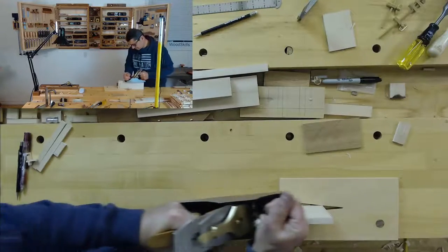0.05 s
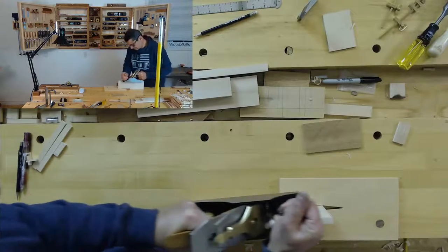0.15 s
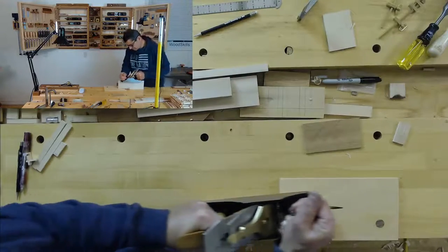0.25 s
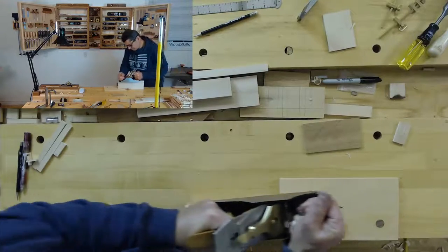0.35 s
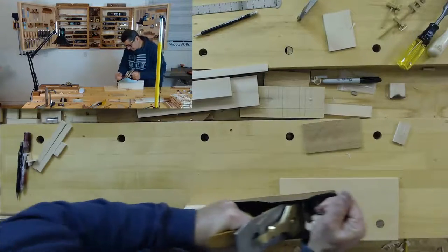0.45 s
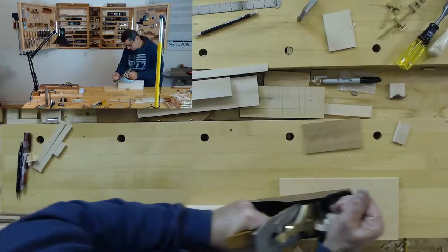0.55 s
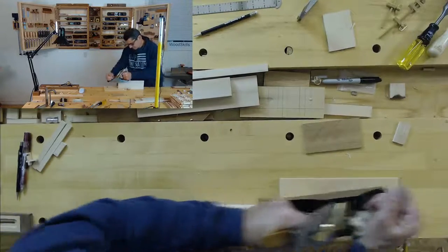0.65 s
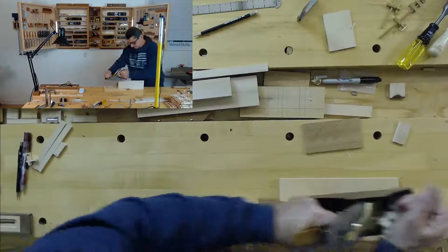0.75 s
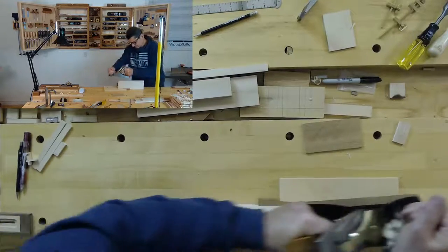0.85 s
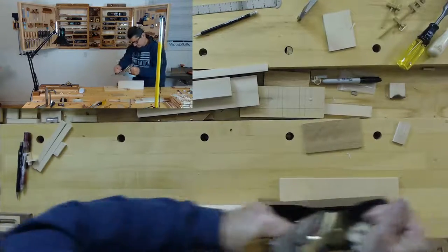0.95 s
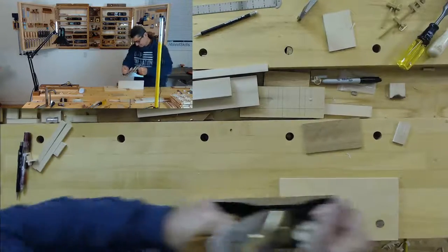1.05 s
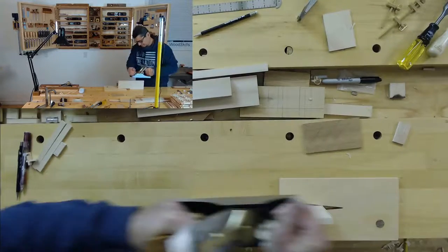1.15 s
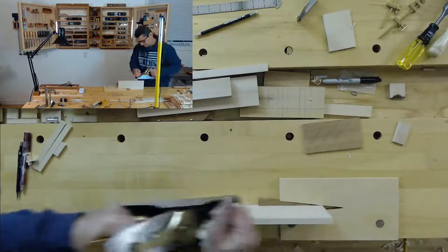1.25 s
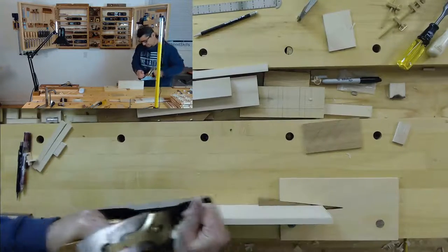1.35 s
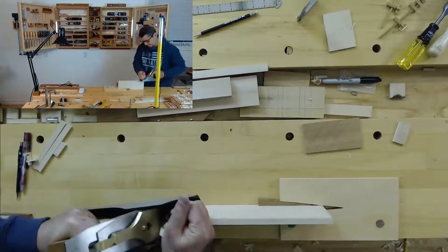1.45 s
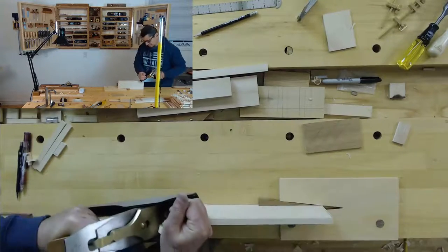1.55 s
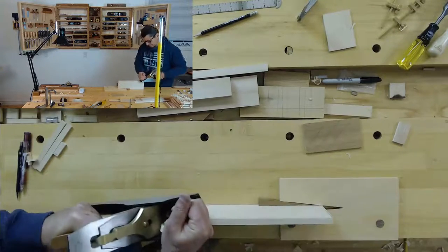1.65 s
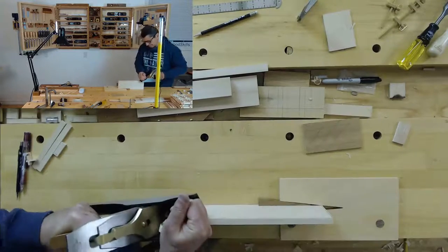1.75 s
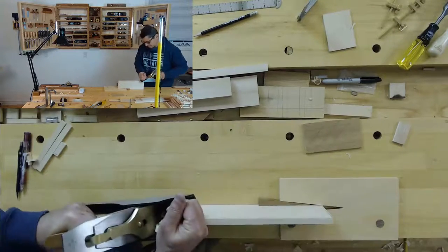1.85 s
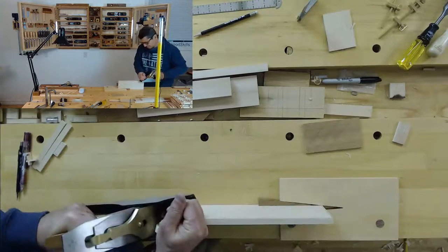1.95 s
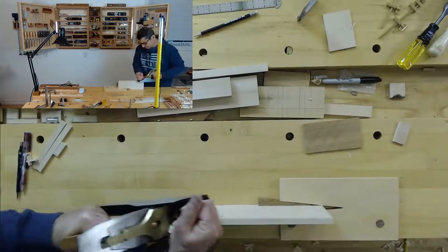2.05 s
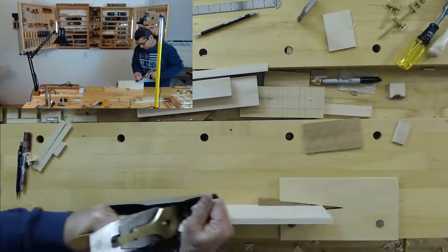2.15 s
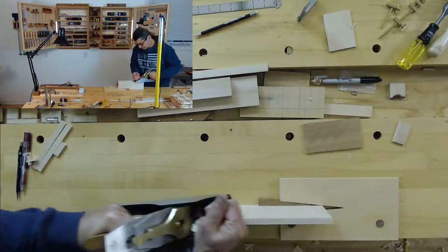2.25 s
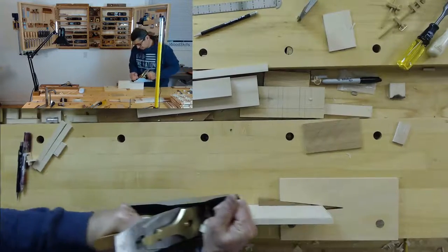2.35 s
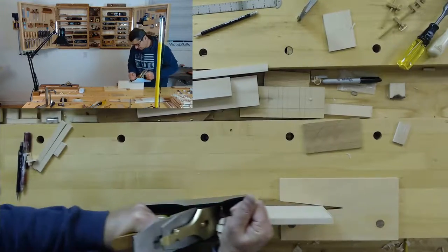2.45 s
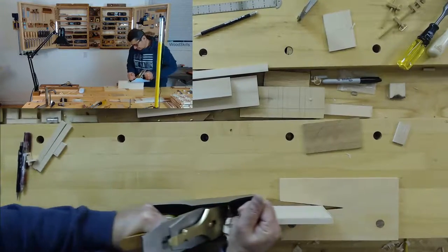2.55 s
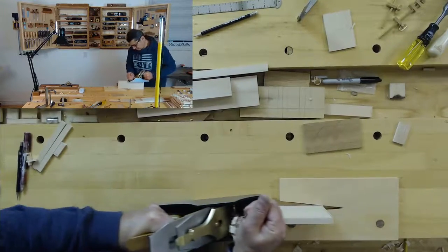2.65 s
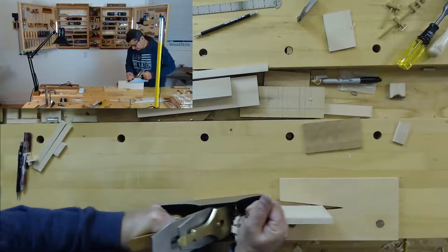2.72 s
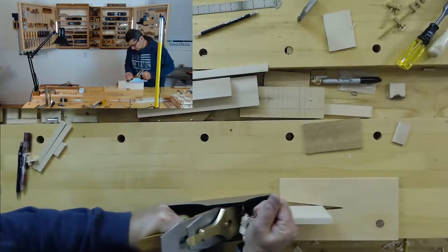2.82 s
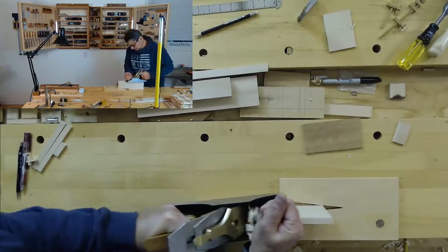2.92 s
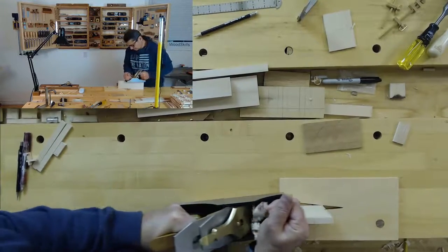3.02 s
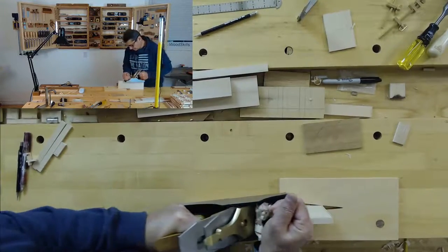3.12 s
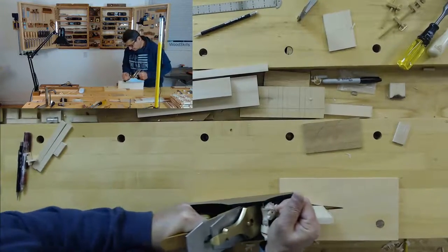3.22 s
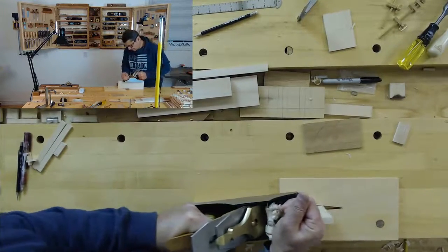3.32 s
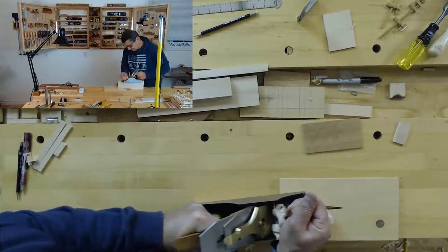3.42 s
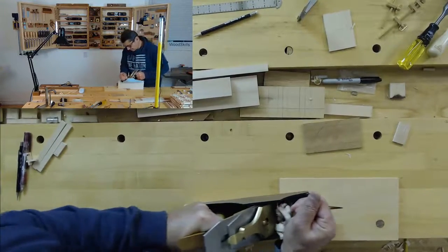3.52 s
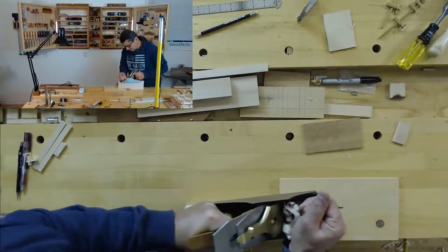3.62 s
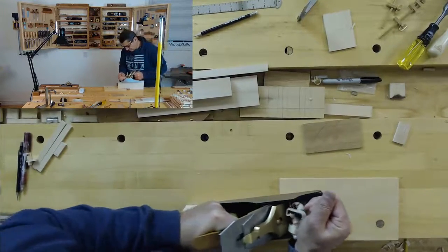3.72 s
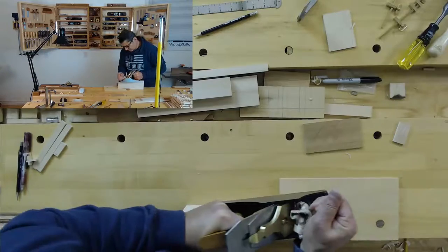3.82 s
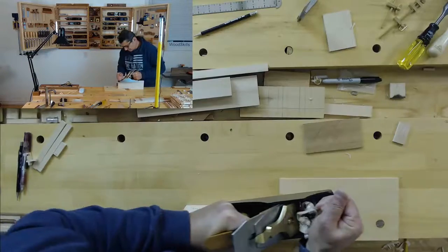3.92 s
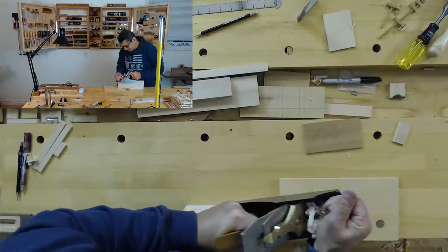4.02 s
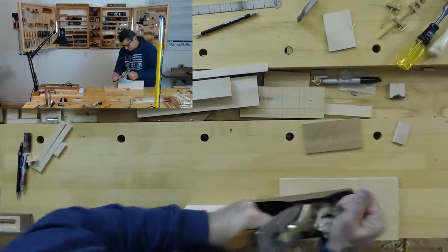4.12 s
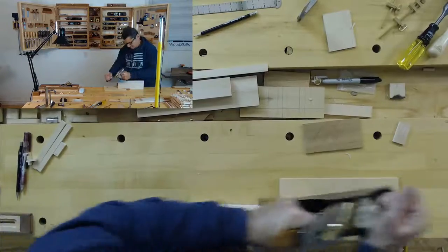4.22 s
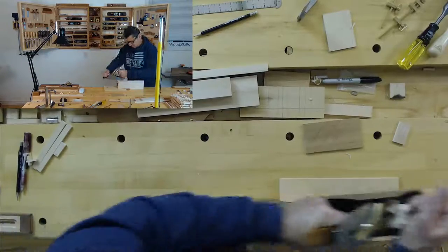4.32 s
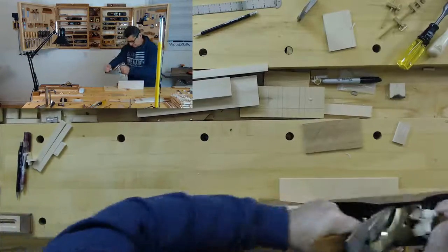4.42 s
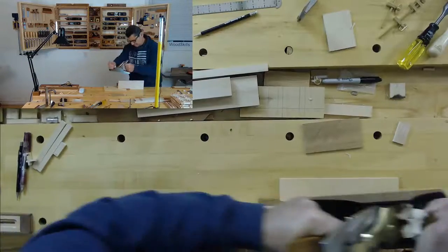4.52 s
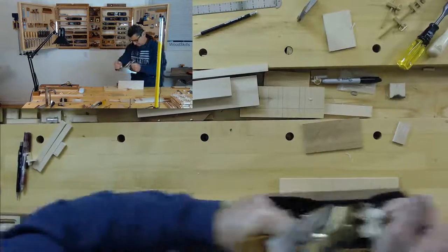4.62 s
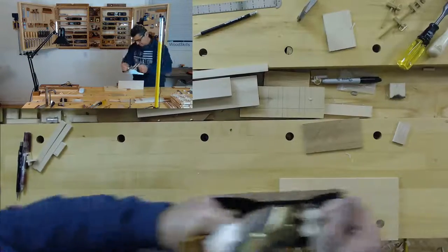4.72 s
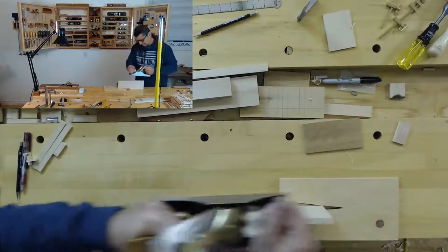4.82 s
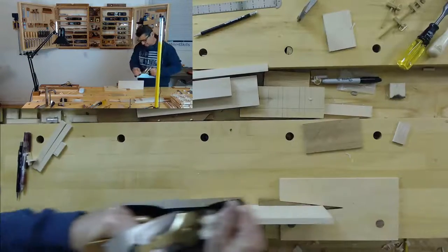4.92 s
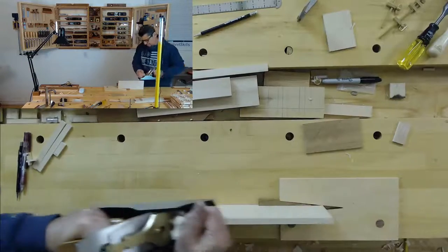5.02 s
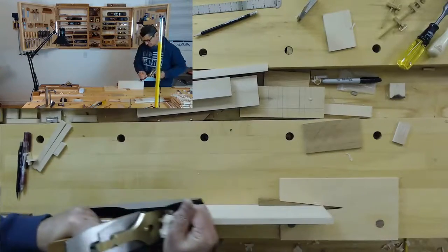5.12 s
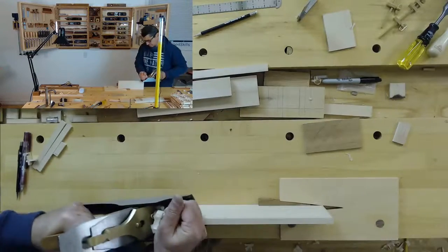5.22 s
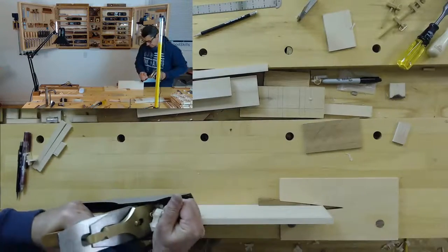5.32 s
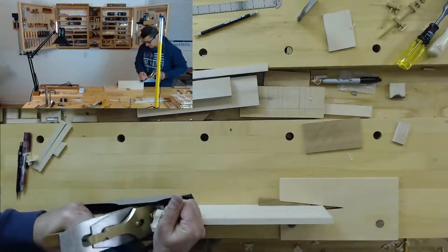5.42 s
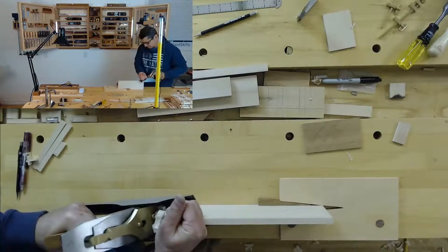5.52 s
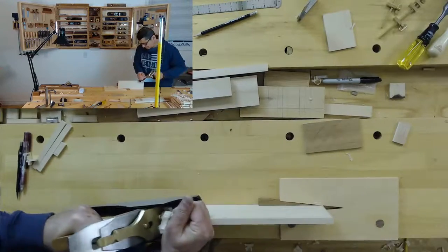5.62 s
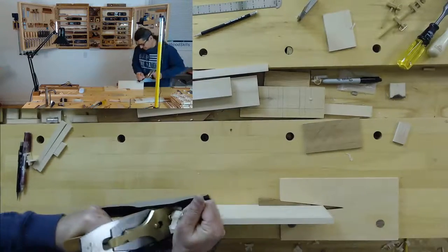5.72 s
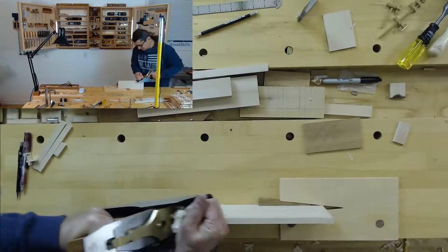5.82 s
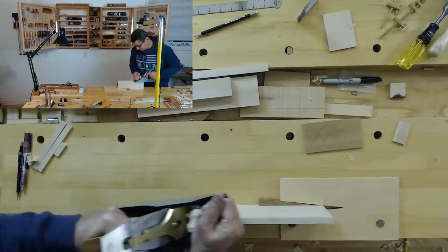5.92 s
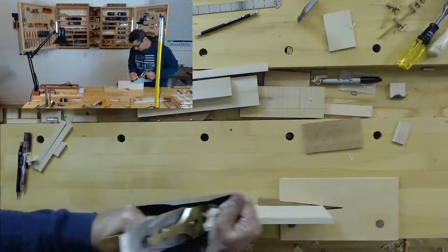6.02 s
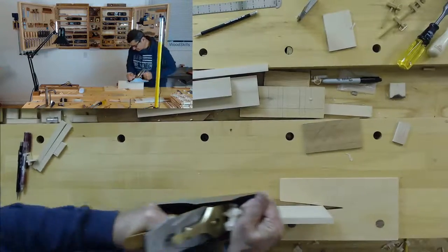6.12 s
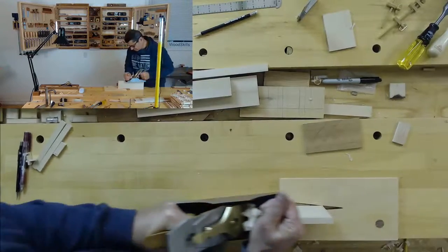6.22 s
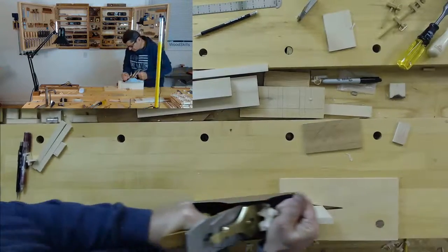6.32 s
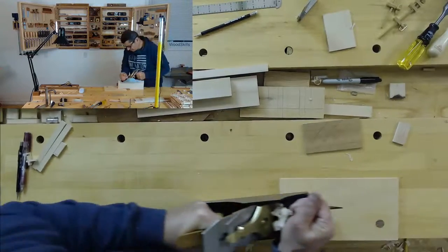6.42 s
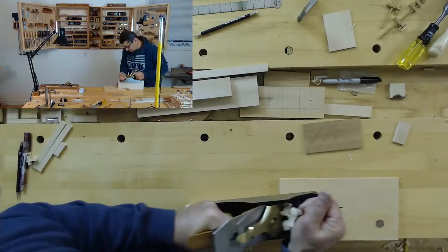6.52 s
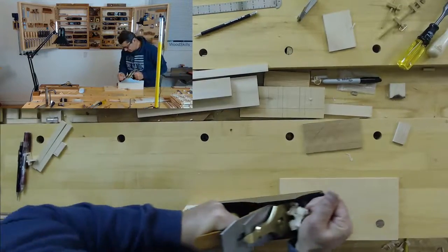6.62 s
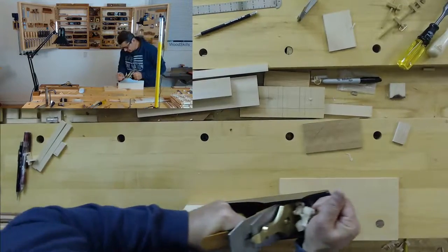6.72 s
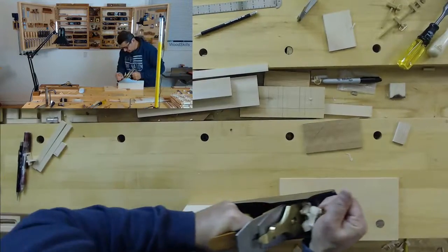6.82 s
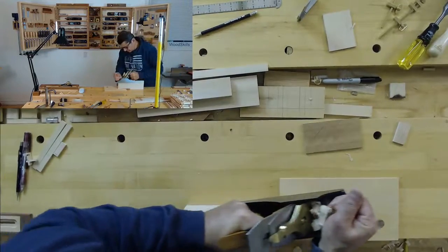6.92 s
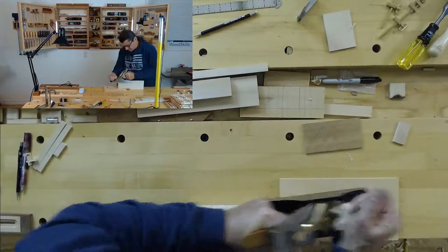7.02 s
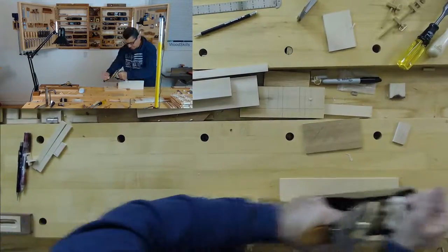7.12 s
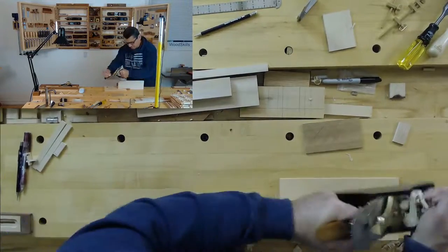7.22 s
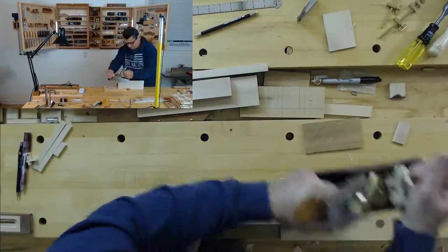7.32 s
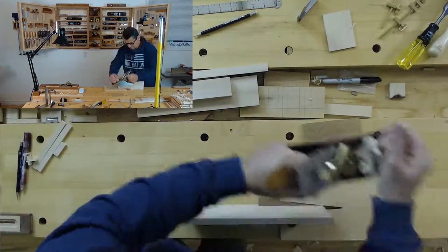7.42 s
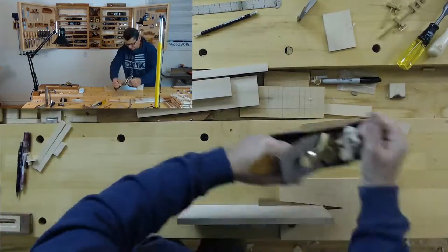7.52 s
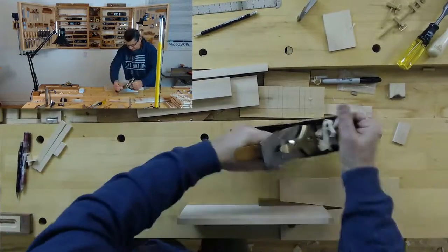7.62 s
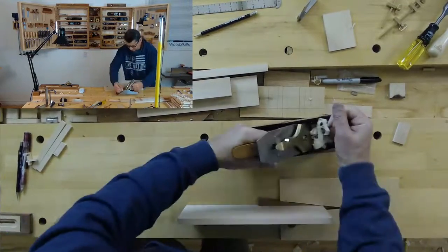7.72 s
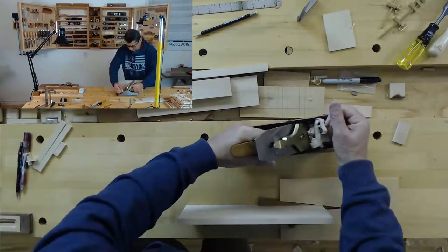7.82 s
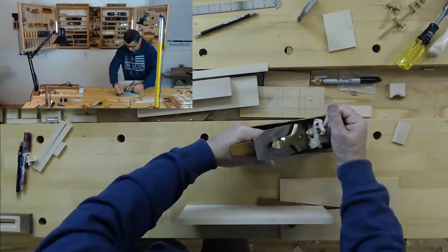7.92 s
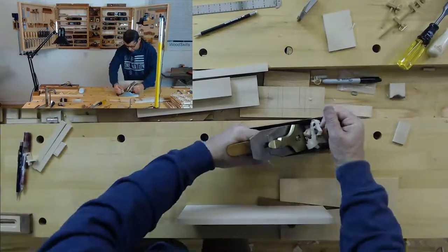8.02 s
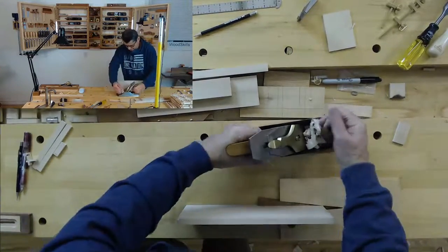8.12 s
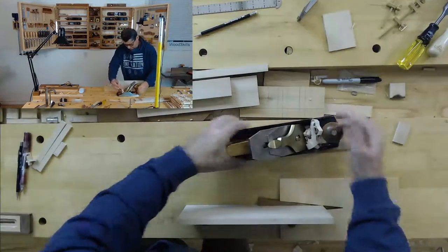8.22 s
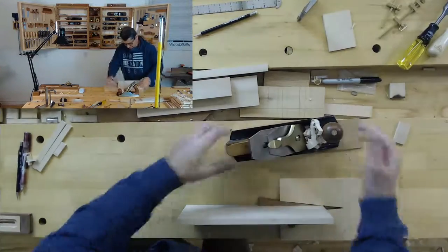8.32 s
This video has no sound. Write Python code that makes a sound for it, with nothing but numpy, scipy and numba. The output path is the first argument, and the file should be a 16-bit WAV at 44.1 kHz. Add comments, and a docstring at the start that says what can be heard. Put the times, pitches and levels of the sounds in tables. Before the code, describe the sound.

A hand plane rasps along a board in three strokes, knocking wood between passes, then thuds down on the bench in an echoing workshop.

```python
"""A metal hand plane takes three strokes along the edge of a board on a heavy bench in an echoing workshop.
Tearing fibres are random tiny breaks that shake resonances of bench, board, sole, iron and shaving.
The plane knocks on wood as it lands, leaves and is set down: decaying modes and a burst of crushed fibres.
Thin metal tinkles and bright shaving snaps come between, over a faint hush of air.
The microphone stands on the bench and takes its low sway directly; echoing noise makes the room."""
import sys
import numpy as np
from scipy import signal
from scipy.fft import rfft, irfft
from scipy.io import wavfile
from scipy.ndimage import uniform_filter1d
from numba import njit

SR = 44100
rng = np.random.default_rng(int(sys.argv[2]) if len(sys.argv) > 2 else 0)


def volts_from_decibels(level):
    """Turn decibel levels (scalar or array-like) into linear amplitude factors."""
    exponent = np.asarray(level, float) / 20
    return 10 ** exponent


def pcm_store(signal):
    """Save signal as 16-bit PCM."""
    levels = np.round(np.clip(np.atleast_2d(signal), -1, 1) * 32767)
    wavfile.write(sys.argv[1], SR, levels.astype(np.int16).T)


N = 368655   # length [samples]

# All table levels are relative: each is set before the mode strengths and mix gains that follow.
# Plane strokes, one list each: (time [s], bench [dB], board [dB], iron [dB],
# low pitch [Hz], high pitch [Hz]), the pitches being those of the board's free length
STROKES = [
    [(0.0, -35, -33.5, -44.5, 262, 850), (0.24, -38, -32.5, -51.5, 280, 1105),
     (0.4, -34, -25, -50, 297, 1190), (0.49, -32.5, -31.5, -45.5, 458, 915),
     (0.576, -29.5, -24.5, -36.5, 444, 1090), (0.602, -27, -23.5, -32.5, 445, 1100),
     (0.612, -11, -17.5, -48, 437, 1160), (0.64, -33.5, -28.5, -55, 430, 1160)],
    [(1.93, -60, -62, -76, 196, 777), (2.041, -52, -46, -46, 197, 770), (2.048, -39.5, -33, -47, 193, 740),
     (2.25, -40, -34.5, -46.5, 187, 850), (2.4, -39.5, -33, -50.5, 198, 1250),
     (2.62, -39.5, -40, -56, 258, 930), (2.86, -37, -39.5, -54, 282, 945), (3.08, -39, -41, -54, 280, 930),
     (3.2, -40, -46, -56.5, 287, 940), (3.4, -38.5, -36, -55, 311, 880), (3.72, -37, -42.5, -57, 466, 974),
     (3.98, -28.5, -34.5, -57, 520, 665), (4.1, -27, -28, -41, 408, 700), (4.15, -27.5, -37, -34, 350, 734),
     (4.162, -23, -21.5, -37, 370, 710), (4.19, -36, -18, -57, 370, 710)],
    [(5.78, -54, -54, -60, 281, 786), (5.826, -38, -34, -46.5, 278, 880),
     (5.92, -44, -31, -45.5, 250, 1230), (6.1, -37, -36, -44, 303, 1200),
     (6.35, -43, -33, -49.5, 285, 1395), (6.55, -41, -36, -53.5, 283, 1265),
     (6.72, -39.5, -37.5, -54.5, 510, 900), (6.84, -28.5, -39.5, -57, 430, 790),
     (6.976, -39, -28, -39, 305, 1086), (7.02, -21, -32, -34, 280, 1200),
     (7.04, -47, -36.5, -39, 294, 1110), (7.16, -36.5, -42, -63, 274, 1110)],
]
# Brief scuffs as the plane is put in place or lifted: (time [s], t60 [s], bench [dB], board [dB], iron [dB])
SCUFFS = [(1.52, 0.17, -47, -57, -66), (1.88, 0.43, -52.5, -49, -70), (5.038, 0.85, -50.5, -56, -58.5),
          (5.14, 0.26, -60, -56, -62), (5.215, 0.8, -63, -53, -59), (5.55, 0.69, -44.5, -47, -57),
          (5.676, 0.17, -53, -31, -42.5), (7.492, .12, -58, -55, -50)]
# Resonances shaken by the cut, six tables: (centre [Hz], width [Hz], level [dB])
BENCH_BOOM_MODES = [(98, 9, -12.5), (125.6, 7.3, 1.5), (154.3, 40, -5)]
BENCH_TOP_MODES = [(205.6, 15, 1.5), (274.6, 99, -8.5), (382, 64, -19), (430, 37, 0.5), (520, 81, -3),
                   (621, 187, -7.5)]
BOARD_EDGE_MODES = [(683, 138, 6.5), (886, 61, 6.5), (988, 210, 6.5), (1156, 79, 4.5), (1318, 207, 7),
                    (1467, 33, 4)]
SOLE_MODES = [(1650, 220, -8.5), (1915, 280, 10.5), (2243, 180, -0.5), (2560, 300, -6), (2810, 1000, -26.5)]
IRON_MODES = [(2920, 520, -5), (3590, 146, 5.5), (4086, 380, 0.5), (5110, 550, -1.5), (5570, 200, 1),
              (6170, 540, -4.5), (7050, 1170, 0.5), (7750, 210, -0.5), (8530, 600, -7)]
SHAVING_MODES = [(9560, 870, -2), (11100, 1000, -12), (12550, 3300, 3), (13700, 1200, -12),
                 (14700, 830, -1), (15600, 580, -18)]
# Blows and shoves that jolt the bench on its legs: (time [s], rocking [dB], bounce [dB])
JOLTS = [(0.0, -40, -60), (0.55, -34, -31), (0.85, -41.5, -55), (1.62, -34, -42), (1.78, -31.5, -50),
         (2.03, -31, -38.5), (2.17, -31, -40), (2.48, -35, -51), (4.22, -41, -50), (5.32, -29, -41),
         (5.66, -34, -31), (5.87, -37, -38), (6.18, -35, -52), (6.89, -38, -41), (7.02, -27, -28),
         (7.4, -37.5, -48), (7.93, -31, -32), (7.98, -27.5, -25.5), (8.15, -34, -41), (8.27, -38, -38)]
# Spectrum of the quiet workshop: (frequency [Hz], level per Hz [dB])
AIR_SPECTRUM = [(18, -34), (30, -25), (75, -8), (114, -17), (152, -6), (187, -12), (369, -13.5),
                (399, -20.5), (830, -21), (921, -24.5), (15500, -48.5)]
# Echo of the workshop: (frequency [Hz], t60 [s], level [dB])
ROOM_ECHO = [(125, 0.51, 2), (510, 0.82, 3.5), (1370, 0.96, -0.5), (3980, 0.87, -1), (8000, 0.61, -2.5),
             (14000, 0.45, -5)]
# Blows of the plane on wood: (time [s], board [dB], bench top [dB], plank [dB], metal [dB])
KNOCKS = [(0.61, -14, -32.5, -33, -26), (1.521, -41, -57, -67, -54), (1.62, -15, -24.5, -20, -57),
          (2.046, -41, -47, -37.5, -36), (3.145, -26, -50, -53, -61), (4.16, -11, -44, -23, -26),
          (5.039, -28, -49, -69, -40), (5.209, -36.5, -66, -52, -42), (5.267, -37, -54, -64, -54),
          (5.327, -12.5, -23.5, -18, -31.5), (5.675, -55, -39.5, -35, -36), (7.028, -45, -25, -34, -42),
          (7.121, -55.5, -45, -31, -42), (7.494, -52, -61, -75, -53), (7.928, -24.5, -9, -26, -20),
          (7.959, -49, -17, -35.5, -53), (7.987, -10.5, -37, -13, -46)]
# What a blow rings, a list each for board, bench boom, bench top, plank and metal:
# (frequency [Hz], level [dB], t60 [s])
KNOCK_MODES = [
    [(880, -5.5, 0.024), (1000, -13.5, 0.077), (1124, -3.5, 0.025), (1223, -9.5, 0.044), (1412, 0.5, 0.017),
     (1766, -7, 0.018), (2003, -6, 0.017), (2430, -5, 0.009), (2840, -19, 0.0037)],
    [(124, 7, 0.22), (150.4, 1.5, 0.14)],
    [(211.6, 1, 0.19), (233, -17, 0.21), (280, -8, 0.29)],
    [(318, 7, 0.017), (439, 1.5, 0.068), (520, 4, 0.059), (590, 0.5, 0.024), (728, 8.5, 0.014)],
    [(3190, -2, 0.012), (3740, -3, 0.0069), (4090, 4, 0.0044), (4800, -13, .005), (5370, -6.5, 0.0093),
     (6540, -14.5, 0.0065), (7700, -8.5, 0.0054)],
]
# Faint rings of a loose part of the plane: (time [s], level [dB])
TINKLES = [(1.252, -66), (7.496, -51.5)]
# Modes of that loose part: (frequency [Hz], level [dB], t60 [s])
TINKLE_MODES = [(3170, -7.5, 0.27), (3210, -7, 0.27), (1250, -6, .05), (2050, -3, .05), (4700, -7, .03)]
# The shaving snaps as it curls: (time [s], level [dB])
SNAPS = [(2.335, -43), (2.542, -45), (2.5646, -66), (2.615, -40), (2.9194, -54), (3.0658, -40),
         (3.2555, -49), (3.5224, -44), (3.5644, -43), (3.7319, -40), (3.7589, -43), (5.8207, -51),
         (6.9461, -39), (7.441, -68), (7.4644, -48), (8.1414, -48)]

BOOM_DB, SOLE_DB, SHAVING_DB = -7.5, 3, -7.5   # boom to bench, sole to board and iron, shaving to iron
SOLE_FOLLOWS_IRON = 0.78   # share 0-1, the rest follows the board
SHAVING_GROWS_DB = 5   # the curl rustles louder from the start to the end of a stroke
RASP_DB, RASP_HZ, RASP_WIDTH_HZ = -12, 1900, 2600   # broad grit under the sole, against the sole
SCUFF_RISE_S = 0.002
ROCK_HZ, ROCK_WIDTH_HZ, ROCK_RISE_S, ROCK_T60_S = 32.9, 10.7, 0.042, 1.2   # nominal width
BOUNCE_HZ, BOUNCE_WIDTH_HZ, BOUNCE_RISE_S, BOUNCE_T60_S = 66.5, 14, 0.0097, 0.59   # nominal width
ROCK_REST_DB, BOUNCE_REST_DB = -52.5, -61   # always present
ROCK_PUSHED_DB, BOUNCE_PUSHED_DB = -53, -70   # added during a stroke
FLUTTER_DB = 2   # unevenness of the bench motions
AIR_DB = -54   # rms above 100 Hz
ROOM_RISE_S = 0.00077
KNOCK_BOOM_DB = 3   # the boom follows the weaker of bench top and plank


def rms_one(x):
    """Scale to rms 1."""
    return x / np.sqrt(np.mean(x ** 2) + 1e-20)


def at_hz(points, hz):
    """Read a two-column table along log frequency."""
    table_hz, level = np.array(points).T
    return np.interp(np.log(hz + 1), np.log(table_hz), level)


def drift(rate_hz):
    """Slow chance of rms 1: noise drawn 200 times a second, smoothed by two poles at rate_hz."""
    steps = rng.standard_normal(int(N / SR * 200) + 400)
    r = np.exp(-2 * np.pi * rate_hz / 200)
    slow = signal.lfilter([1], [1, -2 * r, r * r], steps)[390:]   # skip the settling
    return np.interp(np.arange(N) / SR * 200, np.arange(len(slow)), rms_one(slow))


def swell(s, db, rise_s, t60):
    """Envelope of one event: quick rise, then an even fall in dB."""
    age = np.clip(np.arange(N) / SR - s, 0, None)
    return volts_from_decibels(db - 60 * age / t60) * (1 - np.exp(-age / rise_s))


def resonance(x, hz, width_hz):
    """Two-pole resonance with gain 1 on top."""
    r = np.exp(-np.pi * width_hz / SR)
    top = (1 - r * r) / 2
    return signal.lfilter([top, 0, -top], [1, -2 * r * np.cos(2 * np.pi * hz / SR), r * r], x)


@njit
def gliding(x, hz, width_hz, sr):
    """A two-pole resonance whose centre moves from sample to sample."""
    out, r = np.zeros(len(x)), np.exp(-np.pi * width_hz / sr)
    for i in range(2, len(x)):
        feedback = 2 * r * np.cos(2 * np.pi * hz[i] / sr) * out[i - 1] - r * r * out[i - 2]
        out[i] = x[i] - x[i - 2] + feedback
    return out


def fibres(per_s, spread_db):
    """Random tiny breaks of either sign and uneven size."""
    sizes = volts_from_decibels(spread_db * np.minimum(rng.exponential(1, N), 5)) * rng.choice([-1, 1], N)
    return sizes * (rng.random(N) < per_s / SR) + 1e-18


def body(shake, modes, patchy_db):
    """Parallel resonances, each shaken at its own spot; the grain of the wood favours now one, now another."""
    total = 0
    for k, (hz, width_hz, db) in enumerate(modes):
        strength = volts_from_decibels(db + patchy_db * drift(8.0))
        own_shake = np.roll(shake, 997 * k)
        broad = resonance(own_shake, hz, 3.0 * width_hz)
        total = total + strength * resonance(broad, hz, width_hz)
    return rms_one(total)


def cutting():
    """Fibre breaks drive bench, board, sole, iron and shaving while the plane slides."""
    t = np.arange(N) / SR
    gains = np.full((3, N), 1e-6)   # bench, board, iron
    along = np.zeros(N)   # share of the stroke done
    for rows in STROKES:
        s, *levels = np.transpose(rows)[:4]
        on = (t >= s[0]) & (t < s[-1])
        gains[:, on] += [volts_from_decibels(np.interp(t[on], s, db)) for db in levels]
        along[on] = (t[on] - s[0]) / (s[-1] - s[0])
    for s, t60, *levels in SCUFFS:
        gains += volts_from_decibels(np.array(levels))[:, None] * swell(s, 0, SCUFF_RISE_S, t60)
    on_bench, on_board, on_iron = uniform_filter1d(gains, size=90)
    on_sole = volts_from_decibels(SOLE_DB) * on_iron ** SOLE_FOLLOWS_IRON * on_board ** (1 - SOLE_FOLLOWS_IRON)

    bite = volts_from_decibels(2.15 * drift(27) + 0.6 * drift(70))   # the edge digs and slips
    coarse = bite * fibres(5000, spread_db=2.0)
    fine = bite * fibres(9000, spread_db=3.5)

    # two gliding pitches of the free length; the reversed breaks keep the second independent
    s, *_, low_hz, high_hz = np.vstack(STROKES).T
    low = rms_one(gliding(coarse, np.interp(t, s, low_hz), 45.0, SR))
    high = rms_one(gliding(coarse[::-1].copy(), np.interp(t, s, high_hz), 83.0, SR))

    bench = rms_one(body(coarse, BENCH_TOP_MODES, patchy_db=3.0) + volts_from_decibels(0.5) * low)
    board = rms_one(body(coarse, BOARD_EDGE_MODES, patchy_db=3.5) + volts_from_decibels(-2.5) * high)
    rasp = volts_from_decibels(RASP_DB) * rms_one(resonance(fine, RASP_HZ, RASP_WIDTH_HZ))
    sole = body(coarse, SOLE_MODES, patchy_db=2.0) + rasp
    boom = volts_from_decibels(BOOM_DB) * body(coarse, BENCH_BOOM_MODES, patchy_db=4.0)
    curl = volts_from_decibels(SHAVING_DB + SHAVING_GROWS_DB * (along - 1.0) + 1.1 * drift(6.0))
    shaving = curl * body(fine, SHAVING_MODES, patchy_db=2.0)
    iron = body(fine, IRON_MODES, patchy_db=3.2) + shaving
    return volts_from_decibels(-3.5) * (on_bench * (bench + boom) + on_board * board + on_sole * sole + on_iron * iron)


def sway():
    """Rocking and bounce of the bench, each a wandering tone plus narrow noise, straight into the microphone."""
    t, jolts = np.arange(N) / SR, np.array(JOLTS)
    in_stroke = sum(1.0 * (t >= rows[0][0]) * (t < rows[-1][0]) for rows in STROKES)
    pushing = uniform_filter1d(in_stroke, size=4000)
    motions = [
        (ROCK_HZ, ROCK_WIDTH_HZ, ROCK_RISE_S, ROCK_T60_S, ROCK_REST_DB, ROCK_PUSHED_DB),
        (BOUNCE_HZ, BOUNCE_WIDTH_HZ, BOUNCE_RISE_S, BOUNCE_T60_S, BOUNCE_REST_DB, BOUNCE_PUSHED_DB)]
    out = 0
    for k, (hz, width_hz, rise_s, t60, rest_db, pushed_db) in enumerate(motions):
        steady = volts_from_decibels(rest_db) + volts_from_decibels(pushed_db) * pushing
        jolted = sum(swell(s, db, rise_s, t60) ** 2 for s, db in jolts[:, [0, k + 1]])
        level = np.sqrt(steady ** 2 + jolted)
        wandering_hz = hz + 0.585 * width_hz * drift(4.25)
        swing = np.sqrt(2) * np.sin(2 * np.pi * np.cumsum(wandering_hz) / SR)
        shake = resonance(rng.standard_normal(N), hz, 1.15 * width_hz)
        shake = rms_one(resonance(shake, hz, 1.15 * width_hz))
        out = out + level * volts_from_decibels(FLUTTER_DB * drift(6.5)) * (swing + 0.56 * shake)
    return out


def air():
    """Steady faint hush: noise shaped by the spectrum of the quiet workshop."""
    hz = np.arange(N // 2 + 1) * SR / N
    shaped = rfft(rng.standard_normal(N)) * volts_from_decibels(at_hz(AIR_SPECTRUM, hz))
    total_power = np.sum(abs(shaped) ** 2)
    scale = np.sqrt(total_power / np.sum(abs(shaped[hz > 100]) ** 2))
    return volts_from_decibels(AIR_DB) * scale * rms_one(irfft(shaped, N))


def workshop(x):
    """Dense echoes: noise that builds up, then dies band by band."""
    t, echo = np.arange(SR) / SR, 0
    room_hz, room_t60, room_db = np.array(ROOM_ECHO).T
    edges = 60 * 2.0 ** np.arange(0, 8.6, 0.5)   # half octaves
    for low, high in zip(edges, edges[1:]):
        log_hz = np.log(np.sqrt(low * high))
        t60 = np.interp(log_hz, np.log(room_hz), room_t60)
        db = np.interp(log_hz, np.log(room_hz), room_db)
        fade = volts_from_decibels(-60 * t / t60) * (1 - np.exp(-t / ROOM_RISE_S))
        bandpass = signal.butter(2, [low, min(high, 0.45 * SR)], "band", fs=SR, output="sos")
        band = signal.sosfilt(bandpass, rng.standard_normal(SR))
        echo = echo + volts_from_decibels(db) * band * fade / np.sqrt(np.sum(fade ** 2))
    return signal.fftconvolve(x, echo)[:N]


def knocks():
    """Each blow rings every mode with a strength of its own; returns the wooden part and the metal clack."""
    rows, out = np.array(KNOCKS), np.zeros((len(KNOCK_MODES), N))
    boom_db = rows[:, 2:4].min(axis=1) + KNOCK_BOOM_DB
    rows = np.insert(rows, 2, boom_db, axis=1)
    at = np.round(rows[:, 0] * SR).astype(int)
    for part, modes in enumerate(KNOCK_MODES):
        luck_db = rng.normal(0, 1.33, (len(at), len(modes)))
        for k, (hz, db, t60) in enumerate(modes):
            clicks = np.full(N, 1e-18)
            clicks[at] = volts_from_decibels(rows[:, 1 + part] + db + luck_db[:, k]) * (-1) ** k
            r, w = volts_from_decibels(-60 / (t60 * SR)), 2 * np.pi * hz / SR
            ring = signal.lfilter([0, np.sin(w)], [1, -2 * r * np.cos(w), r * r], clicks)
            out[part] += resonance(ring, hz, 0.5 * hz)   # a mode takes a few cycles to swing up
    crack = np.full(N, 1e-18)
    crack[at] = volts_from_decibels(rows[:, 1] - 10.5)   # fibres crushed under the blow
    crack = signal.lfilter([1], [1, -np.exp(-1 / (0.0094 * SR))], crack) * rng.standard_normal(N)
    dull = signal.butter(2, 7000, fs=SR, output="sos")
    crushed = signal.sosfilt(dull, resonance(crack, 1900, 2500))
    return out[:-1].sum(axis=0) + crushed, out[-1]


def tinkles():
    """Thin metal rings: decaying sines of a loose part."""
    t, out = np.arange(N) / SR, 0
    for s, db in TINKLES:
        for hz, mode_db, t60 in TINKLE_MODES:
            out = out + swell(s, db + mode_db, 0.0005, t60) * np.sin(2 * np.pi * hz * (t - s))
    return out


def snaps():
    """Very short bright ticks: decaying noise through two high, broad resonances."""
    ticks = np.full(N, 1e-18)
    for s, db in SNAPS:
        ticks[round(s * SR)] = volts_from_decibels(db)
    burst = signal.lfilter([1], [1, -np.exp(-1 / (0.0023 * SR))], ticks) * rng.standard_normal(N)
    return resonance(resonance(burst, 11000, 7000), 12500, 9000)


def scene():
    """Wood radiates all round and fills the room; the small clack comes mostly straight."""
    cut = cutting()
    wood, metal = knocks()
    metal = metal + tinkles()
    straight = cut + volts_from_decibels(-4.5) * wood + metal + snaps()
    echoes = workshop(cut + wood + volts_from_decibels(-2) * metal)
    return (straight + echoes + sway() + air())[None]


def roll_off(x):
    """The treble ends steeply here."""
    return signal.sosfilt(signal.butter(12, 15700, fs=SR, output="sos"), x)


def record(dry):
    """Passes on the finished one-channel mix from the bench microphone."""
    return roll_off(dry)


dry = scene()
out = record(dry)
pcm_store(out)
```